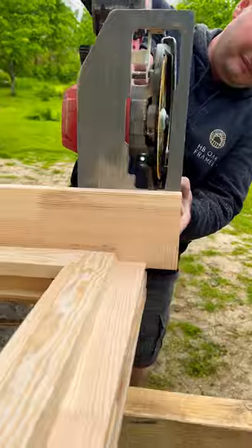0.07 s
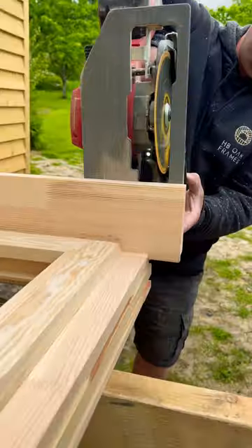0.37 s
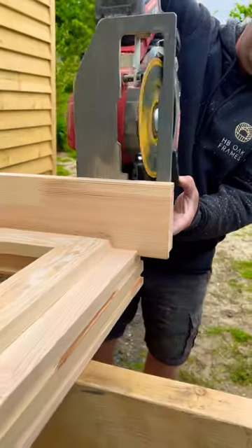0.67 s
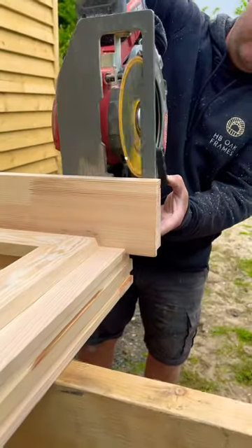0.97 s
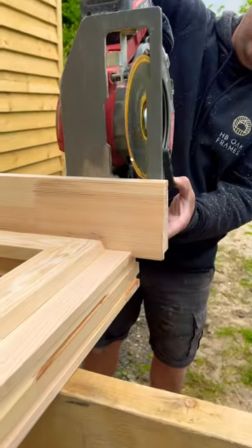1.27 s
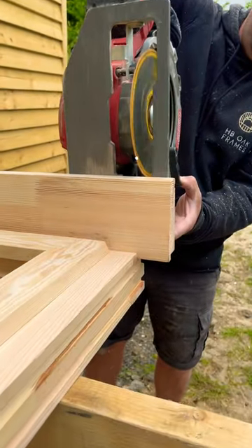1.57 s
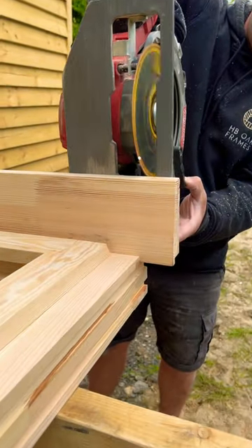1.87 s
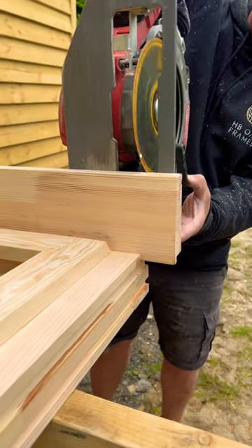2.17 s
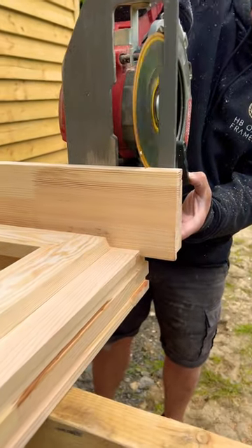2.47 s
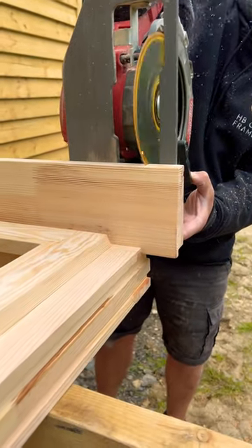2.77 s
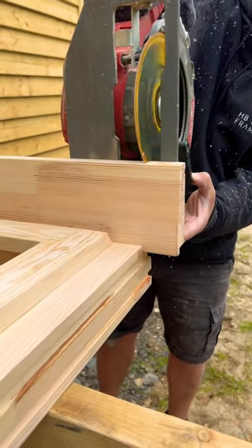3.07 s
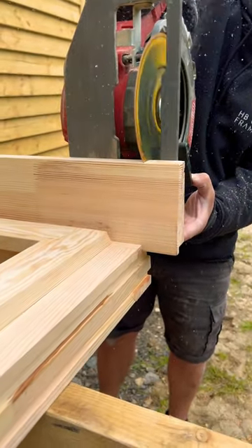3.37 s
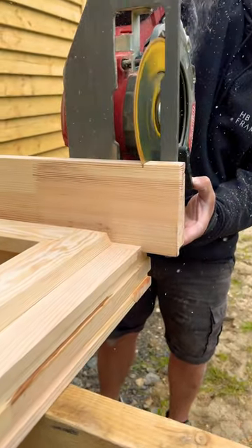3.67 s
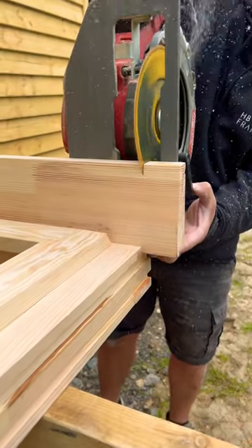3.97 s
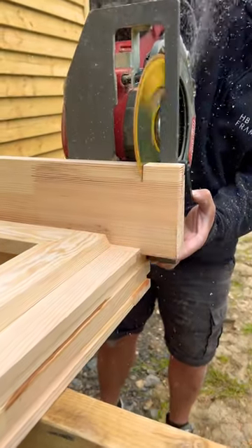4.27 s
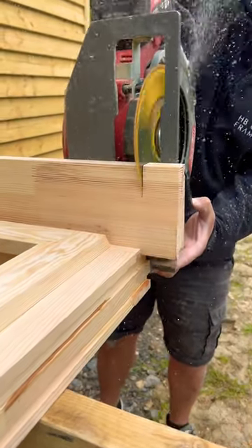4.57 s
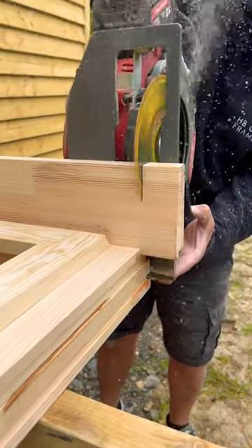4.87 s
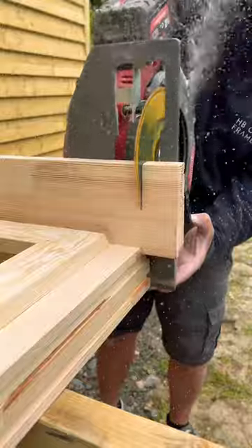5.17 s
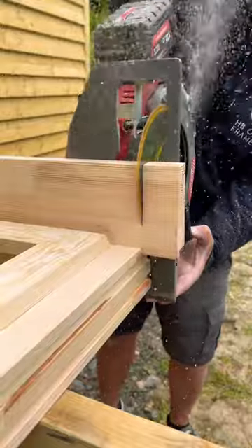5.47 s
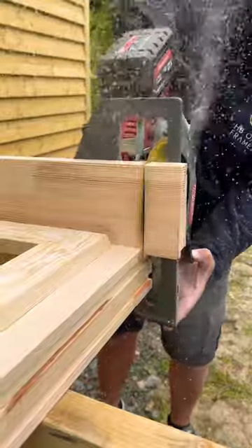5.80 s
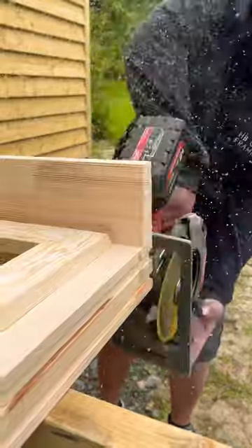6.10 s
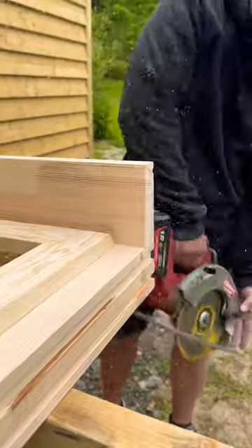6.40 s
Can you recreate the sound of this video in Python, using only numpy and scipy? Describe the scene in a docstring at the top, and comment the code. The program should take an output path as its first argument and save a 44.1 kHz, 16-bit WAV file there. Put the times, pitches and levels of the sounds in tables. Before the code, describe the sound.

Close to the microphone outdoors, a circular saw whirs up to speed, rattles briefly and settles into an airy whine. Then comes a cut of about four seconds through a wooden board, screeching and hissing, with dull taps of chips striking the microphone. The motor sags slightly just before the blade comes free. The saw winds down fast with a faint metallic ring, ending on a small clack of the blade guard.

```python
"""Cordless circular saw through pine

Close by and outdoors, the saw spins up with howling gears, idles in a rush of air, cuts a board and brakes. The
teeth rasp in a pattern that repeats with every turn of the blade, the plate shrieks, and flying chips thump on
the microphone. The offcut knocks down as the brake bites, the stopped blade rings on faintly, and the guard
clacks shut."""
import sys
import numpy as np
from scipy import signal
from scipy.fft import rfft, irfft, next_fast_len
from scipy.io import wavfile
from scipy.ndimage import map_coordinates

SR = 44100
rng = np.random.default_rng(int(sys.argv[2]) if len(sys.argv) > 2 else 0)


def transcribe(signal):
    """Save signal, clipped to [-1, 1], as a 16-bit WAV file at the path in sys.argv[1]."""
    frames = np.atleast_2d(signal).T
    limited = np.clip(frames, -1, 1)
    pcm = np.round(limited * 32767).astype(np.int16)
    wavfile.write(sys.argv[1], SR, pcm)


N = 292824

TEETH, GEAR_RATIO = 24, 24 / 9  # teeth on the blade, motor turns per turn of the blade
TRIGGER_S, PULL_S = 0.035, 0.42  # switched on, end of full torque
ENTRY_S, EXIT_S = 1.941, 5.95  # the blade meets the board, breaks through
BRAKE_S, STOP_S = 6.075, 6.515  # switched off, standing still
# The governed speed sags deep in the cut and races at the exit.
# Each row: time in seconds, tooth rate in Hz above cruising.
GOVERNOR = [(0.8, 9.5), (1.2, 0), (5.0, 0), (5.3, -17), (5.58, -15.5), (5.8, 6.5), (5.97, 40.5)]


def amp(db):
    """Decibels to gain."""
    return 10 ** (np.asarray(db) / 20)


def unit(x):
    """Scale to rms 1."""
    return x / np.sqrt(np.mean(x ** 2) + 1e-20)


def clock():
    """Seconds at each sample."""
    return np.arange(N) / SR


def since(s):
    """Seconds gone by after a moment, zero before it."""
    return np.maximum(clock() - s, 0)


def gate(on, off, attack_s, release_s):
    """An envelope that rises from on, holds, and dies away from off."""
    return (1 - np.exp(-since(on) / attack_s)) * np.exp(-since(off) / release_s)


def curve(points):
    """Join (seconds, value) points into one value per sample."""
    return np.interp(clock(), *np.transpose(points))


def along(points, hz):
    """Read (Hz, value) points along a log frequency axis."""
    freqs, values = np.transpose(points)
    return np.interp(np.log(hz + 1), np.log(freqs + 1), values)


def wobble(rate):
    """A smooth random curve, rate knots a second."""
    fine = signal.resample_poly(rng.standard_normal(int(N * rate / SR) + 4), up=8, down=1)
    return np.interp(np.arange(N) * (8 * rate / SR), np.arange(len(fine)), fine)


def filtered(x, response):
    """Pass x through a complex frequency response."""
    size = next_fast_len(N + SR // 4)
    return irfft(rfft(x, size) * response(np.fft.rfftfreq(size, 1 / SR)), size)[..., :N]


def spread(pair, colour):
    """Two unrelated signals become one coloured stereo sound whose middle has rms 1."""
    # Stereo width. Each row: frequency in Hz, likeness of left and right from 0 to 1.
    alike = [(100, 1), (2000, 0.49), (8000, 0.85), (14000, 0.14)]

    def shares(hz):
        angle = np.arccos(np.clip(along(alike, hz), 0, 1)) / 2
        return amp(along(colour, hz)) * np.array([np.ones_like(hz), np.tan(angle)])

    mid, side = filtered(pair, shares)
    return np.array([mid + side, mid - side]) / mid.std()


def shaft_tones(lines, turns, flutter_db, flutter_rate):
    """Sines locked to a shaft, each fluttering on its own; lines are (multiple of the turn, dB)."""
    return np.sqrt(2) * sum(amp(db + flutter_db * wobble(flutter_rate))
                            * np.sin(2 * np.pi * (round(multiple) * turns + rng.random()))
                            for multiple, db in lines)


def ringing(x, t60, share, shift_rate):
    """Add the brief ring of a metal part, its colour drifting between two tails."""
    t = np.arange(SR // 20) / SR
    tails = rng.standard_normal((2, 2, len(t))) * amp(-60 * t / t60)
    tails /= np.linalg.norm(tails[0, 0])
    first, second = signal.fftconvolve(np.atleast_2d(x)[None], tails, axes=2)[..., :N]
    shift = 2 * np.pi * np.arange(N) / N + wobble(shift_rate)
    return (x + share * (np.cos(shift) * first + np.sin(shift) * second)) / np.hypot(1, share)


def tooth_rate():
    """Teeth per second: the motor ramps up until its governor holds it; the brake bites ever harder."""
    cruise_hz, knee = 2320, 24  # knee: how sharply the governor takes over
    t = clock()
    ramp_hz = 3800 * t * (1 + .237 * t) * (t > TRIGGER_S)
    held_hz = cruise_hz + curve(GOVERNOR)
    spin_left = np.maximum(1 - since(BRAKE_S) / (STOP_S - BRAKE_S), 0) ** .56
    return ramp_hz / (1 + (ramp_hz / held_hz) ** knee) ** (1 / knee) * spin_left


def screened():
    """Gain of the motor's sounds as it sinks behind the board and swings out again."""
    loss_db, sink_s, emerge_s = 11, 1.32, 1
    hidden = np.minimum(since(ENTRY_S) / sink_s, 1) * np.exp(-since(BRAKE_S) / emerge_s)
    return amp(-loss_db * hidden)


def surge():
    """Gain of air rush and whine, which overshoot after the run-up and settle."""
    overshoot_db, settle_s = 8.5, 0.38
    return amp(overshoot_db * np.exp(-since(PULL_S) / settle_s))


def garden():
    """A faint, dark bed of outdoor noise."""
    return amp(-70.5) * spread(rng.standard_normal((2, N)), [(50, 1.0), (2000, -12), (8000, -20)])


def air(speed, turns):
    """The fan and the blade's gullets churn the air, in a faint pulse with each turn."""
    # Colour of the rush. Each row: frequency in Hz, relative level in dB.
    air_colour = [(30, -67), (55, -9.5), (200, -11.5), (380, -5), (520, 2.5), (720, -4), (1030, 5),
                  (1400, -5.5), (1950, 6), (2700, 4.5), (3200, -0.5), (5400, -1.5), (6400, 5), (9500, -3),
                  (15500, -9)]
    churn = amp(0.26 * np.cos(2 * np.pi * turns) + 1.08 * wobble(60))
    rush = spread(churn * rng.standard_normal((2, N)), air_colour)
    return amp(-26.5) * surge() * screened() * speed ** 2 * rush


def motor(speed, turns):
    """Magnetic hum, whine and fan whistle sway with each blade turn; a drone joins as the speed sags."""
    # Thin whine near full speed. Each row: multiple of the motor shaft, relative level in dB.
    whine_lines = [(10, -43), (18, -47), (23, -37.5), (27, -46)]
    # Fader of the fan's whistle. Each row: time in seconds, relative level in dB.
    fan = [(0.5, -17), (0.8, -18), (0.93, -20.5), (1.11, -19.5), (1.16, -23.5), (1.7, -25.5), (1.9, -31.5)]
    # The blade's drone under a labouring motor. Each row: multiple of the blade's turn, level in dB.
    labour_lines = [(3, -53), (22, -38), (24, -33)]
    shaft = GEAR_RATIO * turns
    sway = 1 + 0.27 * np.cos(2 * np.pi * turns) + 0.17 * np.cos(4 * np.pi * turns)
    cutting = gate(ENTRY_S, EXIT_S, attack_s=.1, release_s=.05)
    shaken = shaft + .01 * cutting * wobble(90)
    hum = amp(-36.5) * speed ** 2 * shaft_tones([(4, 0.012)], shaken, flutter_db=2, flutter_rate=23)
    whine = shaft_tones(whine_lines, shaft, flutter_db=2.5, flutter_rate=32)
    whine *= surge() * speed ** 10 * np.exp(-since(BRAKE_S) / .04)
    sag_hz = np.maximum(-curve(GOVERNOR), 0)
    whistle = shaft_tones([(8, 0)], shaken, flutter_db=3 * cutting, flutter_rate=22)
    whistle *= amp(curve(fan) + .3 * sag_hz) * speed ** 20
    drone = sag_hz / sag_hz.max() * shaft_tones(labour_lines, turns, flutter_db=3, flutter_rate=90)
    return sway * (screened() * (hum + whine) + whistle) + drone


def housing(hz):
    """Frequency response of the gear housing."""
    # Its resonances. Each row: centre in Hz, width in Hz, gain in dB.
    resonances = [(480, 260, -5.5), (700, 150, -7.5), (1040, 188, -0.5), (1387, 146, -0.5), (1810, 250, -2),
                  (2093, 210, -1.5), (2517, 146, -2.5), (2750, 54, -2), (3290, 160, -5), (3520, 120, -3),
                  (4150, 270, -3), (6150, 2700, -9), (7950, 320, -4), (11300, 1400, -10)]
    return sum(amp(db) * 1j * hz * width / (centre ** 2 - hz ** 2 + 1j * hz * width)
               for centre, width, db in resonances)


def gear_howl(speed, shaft, braking):
    """Meshing teeth howl through the housing under the torque of run-up, cut and brake."""
    # The nine-tooth pinion's mesh and side tones. Each row: multiple of the shaft, relative level in dB.
    mesh_lines = [(1, -17), (4, -8), (5, -13), (9, 3), (10, -13), (13, -5)]
    # Braking presses the teeth's back flanks together. Each row: the same columns.
    brake_lines = [(4, -4), (9, -2), (12, 6), (18, -1)]
    governed_s = .495  # the governor takes the torque off
    pull = amp(-17.5) * gate(TRIGGER_S, governed_s, attack_s=0.031, release_s=0.046) * np.sqrt(speed)
    load = pull + amp(-35) * gate(ENTRY_S, EXIT_S, attack_s=.03, release_s=0.19) * screened()
    play = shaft + 0.011 * wobble(200)
    mesh = shaft_tones(mesh_lines, play, flutter_db=3, flutter_rate=75)
    octave = shaft_tones([(18, 1)], play, flutter_db=4, flutter_rate=90)
    octave *= np.sqrt(speed) * load / load.max()  # only hard-pressed teeth sound it
    back_flanks = shaft_tones(brake_lines, shaft + .007 * wobble(300), flutter_db=2, flutter_rate=90)
    howl = filtered(load * (mesh + octave) + amp(-41) * braking * back_flanks, housing)
    return ringing(howl, t60=0.017, share=0.3, shift_rate=5.3)


def gear_rattle(speed, shaft, braking):
    """The gears knock in their backlash and shake the housing."""
    # Unloaded gears slap across the gap. Each row: start in seconds, relative level in dB.
    clatter = [(0.679, -24.5), (0.823, -30), (0.863, -24.5), (0.894, -20)]
    # Colour of the rattle. Each row: frequency in Hz, relative level in dB.
    rattle_colour = [(30, -19), (60, 12), (200, -9), (1100, -0.5), (2000, 7), (15500, -10.5)]
    knocks = amp(2.2 * np.cos(2 * np.pi * shaft) + 1.1 * wobble(500)) * rng.standard_normal((2, N))
    jolt = amp(-39) * gate(TRIGGER_S, TRIGGER_S, attack_s=.001, release_s=0.0098)  # slack taken up
    pull = amp(-17 - 3.5 * speed) * gate(TRIGGER_S, PULL_S, attack_s=0.045, release_s=0.14)
    running = amp(-38.5) * (speed * screened() + braking)
    slaps = sum(amp(db) * gate(s, s + 0.0014, attack_s=0.0011, release_s=.007) for s, db in clatter)
    return spread(filtered(knocks, housing), rattle_colour) * (jolt + pull + running + slaps)


def offcut_and_guard():
    """The offcut drops with a knock as the brake bites; later the sprung guard knocks and bounces on its stop."""
    # The offcut's knock, then the guard's. Each row: start in seconds, relative level in dB.
    knocks = [(6.098, -36), (6.5996, -38.5), (6.606, -41), (6.6138, -41), (6.621, -37.5)]
    # Its modes. Each row: frequency in Hz, relative level in dB, seconds to fade by 60 dB.
    modes = [(724, 2.5, .02), (1370, 4.5, 0.048), (1680, 11, 0.023), (2930, -4, 0.0325)]
    t = np.arange(SR // 8) / SR
    out = np.zeros((2, N + len(t)))
    for s, db in knocks:
        ring = sum(amp(level + rng.normal(0, 2.4, (2, 1)) - 60 * t / t60)
                   * np.sin(2 * np.pi * hz * t + rng.uniform(0, 2 * np.pi)) for hz, level, t60 in modes)
        crack = 0.36 * amp(-60 * t / 0.047) * rng.standard_normal((2, len(t)))
        out[:, round(s * SR):][:, :len(t)] += amp(db - 4.5) * (ring + crack)
    return out[:, :N]


def blade_ring(speed):
    """Free of the wood the plate rings on, sinking in pitch as it loses its spin."""
    # Its modes. Each row: frequency at rest in Hz, relative level in dB, fade in dB per second.
    modes = [(2380, -43, 11.5), (3000, -53.5, -1), (3400, -44, 53), (5910, -40.5, 58.5)]
    kick = amp(9) * np.exp(-since(EXIT_S) / 0.049)
    free = gate(EXIT_S, STOP_S, attack_s=0.024, release_s=0.19) * (kick + 1)
    stiffening = 1 + .064 * speed
    ring = sum(amp(db - fade * since(EXIT_S) + 2.2 * wobble(18))
               * np.sin(2 * np.pi * np.cumsum(hz * stiffening) / SR) for hz, db, fade in modes)
    return np.sqrt(2) * free * ring


def chips():
    """Each chip on the microphone gives a dry tick and a falling thump; fine dust patters between."""
    # The big chips. Each row: start in seconds, relative level in dB.
    hits = [(2.342, -30), (2.902, -26), (3.081, -26), (3.126, -30.5), (3.256, -26.5), (3.312, -24.5),
            (3.327, -24.5), (3.341, -20), (3.406, -24), (3.441, -25), (3.516, -27), (3.538, -26.5),
            (3.692, -28), (4.168, -32), (4.297, -26), (4.889, -33)]
    dust_s = rng.normal(3.1, .4, size=50).clip(2, 6)
    dust_db = rng.normal(-47, 6, size=50).clip(max=-39)
    dull = signal.butter(2, 1500, fs=SR)
    t = np.arange(SR // 8) / SR
    out = np.zeros(N + len(t))
    for s, db in [*hits, *zip(dust_s, dust_db)]:
        fall_s = 0.0059 * np.exp(0.322 * rng.standard_normal())
        pitch_hz = 52 + 600 * np.exp(-t / fall_s)
        envelope = np.exp(-t / 0.018) * (1 - np.exp(-t / 0.0029))
        thump = envelope * np.sin(2 * np.pi * np.cumsum(pitch_hz) / SR)
        tick = unit(signal.lfilter(*dull, rng.standard_normal(len(t)))) * np.exp(-t / 0.012)
        out[round(s * SR):][:len(t)] += amp(db + 4) * (thump + 0.67 * tick)
    return out[:N]


def plate_shriek(turns, push_db, depth, grain):
    """The plate rings at overtones of its turn, damped by the kerf, and sings just before the exit."""
    # The first bite, the plate still free. Each row: multiple of the blade's turn, relative level in dB.
    bite_lines = [(40, -10), (48, -12), (52, -10), (56, -6), (57, -3), (64, 2), (66, -5), (68, -3),
                  (72, -3), (84, 0)]
    # The shriek through the cut. Each row: the same columns.
    shriek_lines = [(20, -5.5), (29, -3.5), (48, -7), (51, -9.5), (60, -11.5), (64, -8.5), (69, -10.5),
                    (72, -8), (75, -8.5), (84, -6.5), (105, -7.5), (118, -5.5)]
    choke_s = 2.16  # the kerf starts to choke the first bite
    bite = shaft_tones(bite_lines, turns, flutter_db=2.5, flutter_rate=25)
    bite *= amp(-25.5) * gate(ENTRY_S, choke_s, attack_s=.05, release_s=.2) ** 2
    shriek = grain * shaft_tones(shriek_lines, turns + .0018 * wobble(50), flutter_db=4.5, flutter_rate=32)
    shriek *= amp(-28.5 + push_db - 9.5 * depth) * gate(ENTRY_S, EXIT_S, attack_s=0.24, release_s=0.1)
    singing = shaft_tones([(29, 0)], turns, flutter_db=-3.0, flutter_rate=17)
    singing *= amp(-34) * gate(EXIT_S - 0.25, EXIT_S, attack_s=0.029, release_s=.05)
    return bite + shriek + singing


def bites(turns, tearing):
    """Each tooth strikes with its own slowly drifting force and timing; fibres tear at random."""
    drift_per_turn, scatter_s, uneven_db, oversample = .04, 7e-6, 2.0, 4
    strike = np.arange(int(turns[-1] * TEETH))
    tooth, turn = strike % TEETH, strike / TEETH

    def habit():
        knots = rng.standard_normal((TEETH, int(turn[-1] * drift_per_turn) + 4))
        return map_coordinates(knots, [tooth, turn * drift_per_turn])

    when = np.interp(turn + .2 * habit() / TEETH, turns, np.arange(N))
    when += scatter_s * SR * rng.standard_normal(len(turn))
    force = amp(uneven_db * habit() + rng.standard_normal(len(turn)))
    # every tooth leaves its own brief scrape, placed between samples
    taps = np.arange(64)
    scrape = rng.standard_normal((TEETH, len(taps))) * np.exp(-taps / (0.0011 * SR))
    fine = signal.resample_poly(scrape, up=oversample, down=1, axis=1)
    start = np.ceil(when).astype(int)
    offset = ((start - when)[:, None] * oversample).astype(int) + oversample * taps
    strokes = force[:, None] * fine[tooth[:, None], offset]
    places = np.clip(start[:, None] + taps, 0, N)
    train = np.bincount(places.ravel(), strokes.ravel(), N + 1)[:N]
    fibres = rng.standard_normal(N) * amp(1.8 * wobble(900))
    return np.sqrt(1 - tearing) * unit(train) + np.sqrt(tearing) * unit(fibres)


def cut(turns):
    """The bites sound through board and blade, louder with the feed, tearing more once it is buried."""
    # How hard the saw is pushed. Each row: time in seconds, relative level in dB.
    feed = [(2.05, -15), (2.32, -18.5), (2.51, -17), (2.66, -24.5), (2.87, -21.5), (3.0, -28.5),
            (3.19, -20.5), (3.6, -19.5), (4.15, -29), (4.27, -24), (5.19, -29.5), (5.24, -23.5),
            (5.56, -28.5), (5.95, -26)]
    # Mid rasp, high screech and top fizz. Each row: frequency in Hz, relative level in dB.
    rasp_colour = [(30, -40), (55, -16), (100, -18.5), (200, -14.5), (600, -15.5), (1400, -5.5),
                   (1800, -0.5), (1980, 0.5), (2450, -0.5), (2830, 11), (3080, -15), (4500, -16)]
    screech_colour = [(3100, -22), (3600, -5.5), (4700, -5), (5450, -7.5), (5950, 0), (7500, -2.5),
                      (8150, 3.5), (9000, -13.5), (10500, -46)]
    fizz_colour = [(8000, -22.5), (9300, -3.5), (10800, -3), (11500, 3.5), (12700, 0), (15800, -9)]
    usual_feed_db, entry_tear, buried_tear = -21, 0.06, 0.62  # tear: share of torn fibres
    push_db = curve(feed) - usual_feed_db
    depth = np.minimum(since(ENTRY_S) / (EXIT_S - ENTRY_S), 1)
    tearing = buried_tear + (entry_tear - buried_tear) * np.exp(-since(ENTRY_S) / 0.36)
    pair = np.array([bites(turns, tearing) for _ in range(2)])
    grain = amp(0.9 * wobble(14))
    pair = grain * ringing(pair, t60=0.05, share=0.6, shift_rate=14)
    chatter_db = 1.5 * wobble(30)
    kerf_db = 11 * depth ** 12 - 4 * depth  # damped along the kerf, flaring at the far edge
    rasp = amp(-30.5 + 0.47 * push_db + kerf_db + chatter_db) * spread(pair, rasp_colour)
    rasp *= gate(ENTRY_S, EXIT_S, attack_s=.17, release_s=.045)
    screech = amp(-22 + push_db) * spread(pair, screech_colour)
    screech *= gate(ENTRY_S, EXIT_S, attack_s=0.21, release_s=0.066)
    spray_db = 6.5 * np.exp(-(clock() - 3.2) ** 2)  # the jet of chips sweeps across the microphone
    fizz = amp(-27.5 + 0.067 * push_db + spray_db) * spread(pair, fizz_colour)
    fizz *= gate(ENTRY_S, EXIT_S + 0.012, attack_s=0.012, release_s=0.013)
    return rasp + screech + fizz + plate_shriek(turns, push_db, depth, grain)


def scene():
    """Air, motor, gears and cut follow the turning of the blade; a quiet garden lies behind."""
    tooth_hz = tooth_rate()
    turns = np.cumsum(tooth_hz) / TEETH / SR
    speed = tooth_hz / tooth_hz.max()
    shaft = GEAR_RATIO * turns
    braking = gate(BRAKE_S, STOP_S, attack_s=0.11, release_s=.02) * speed
    return (garden() + air(speed, turns) + motor(speed, turns)
            + gear_howl(speed, shaft, braking) + gear_rattle(speed, shaft, braking)
            + offcut_and_guard() + blade_ring(speed) + chips() + cut(turns))


def record(dry):
    """Two microphone ports tilt level and phase; peaks are rounded, deep bass and top treble cut."""
    # Balance of the ports. Each row: frequency in Hz, left over right in dB.
    lean = [(130, -1), (380, 1), (700, 8.5), (1100, 6.5), (2300, -2), (4400, 0.5)]
    # Phase between the ports. Each row: frequency in Hz, lead of the left in radians.
    lead = [(250, 0.12), (600, -0.41), (1030, -1.57), (1400, 0.39), (2300, -0.79), (4100, -0.49),
            (5500, -1.19), (13000, -1.18)]
    ceiling, low_hz, top_hz = .92, 42, 15800

    def ports(hz):
        left = amp(along(lean, hz) / 2) * np.exp(.5j * along(lead, hz))
        return np.array([left, 1 / left]) / abs((left + 1 / left) / 2)

    heard = filtered(dry, ports)
    rounded = heard / (1 + (heard / ceiling) ** 8) ** (1 / 8)
    return filtered(rounded, lambda hz: (hz < top_hz) * np.minimum(hz / low_hz, 1) ** 4)


dry = scene()
out = record(dry)
transcribe(out)
```